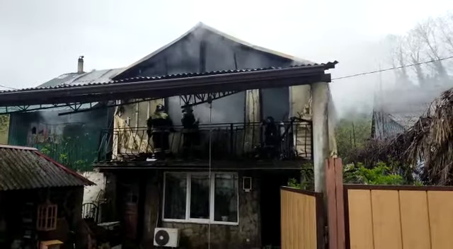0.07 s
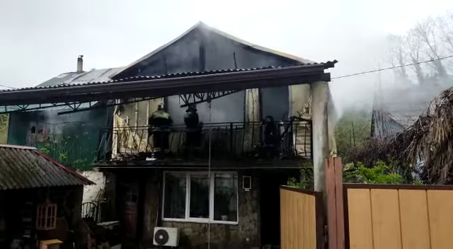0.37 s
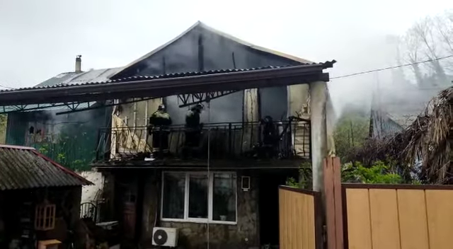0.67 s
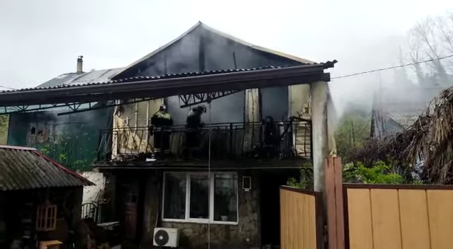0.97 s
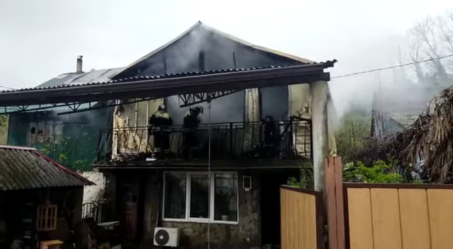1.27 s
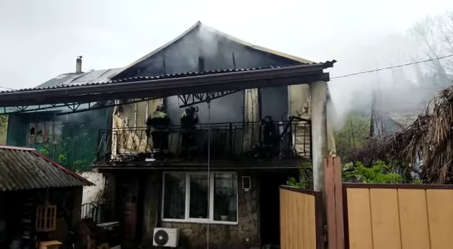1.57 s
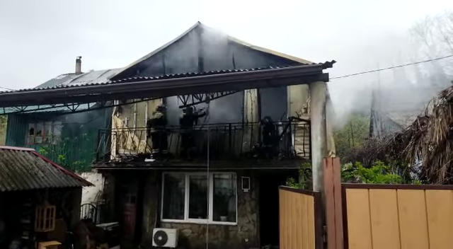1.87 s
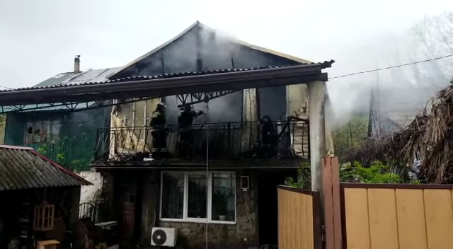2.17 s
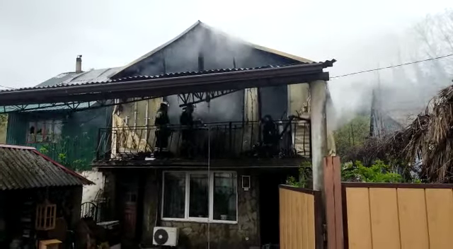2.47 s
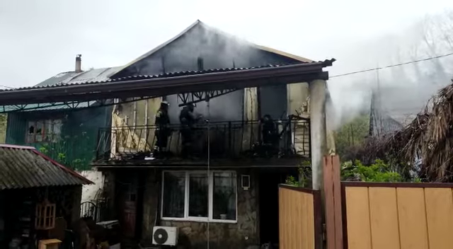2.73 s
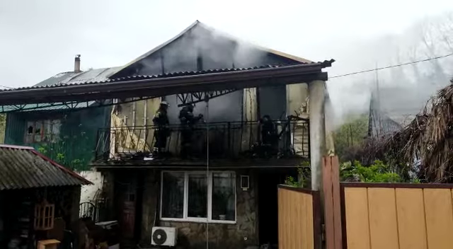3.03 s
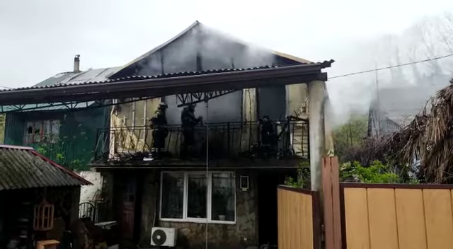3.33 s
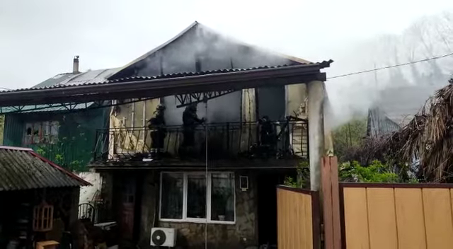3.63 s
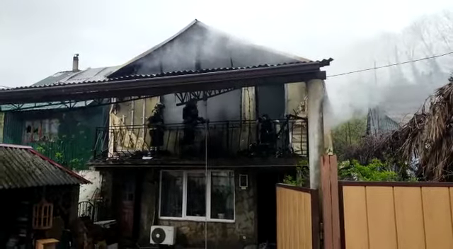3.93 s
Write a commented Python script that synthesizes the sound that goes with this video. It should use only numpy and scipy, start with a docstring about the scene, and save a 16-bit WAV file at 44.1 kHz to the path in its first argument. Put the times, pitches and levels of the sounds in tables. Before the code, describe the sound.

A diesel engine runs steadily outdoors, driving a water pump with a low drone, rapid metallic clatter and a faint whine. Behind it, water spray hisses softly and flares briefly past the middle and again at the end.

```python
"""Outdoors near a burning house, a six-cylinder diesel engine runs steadily and drives a pump.
Behind it lies a low rumble, water spray hisses and flares up briefly, and one distant knock sounds.
The pump hums and the gears whine faintly. Puffs of exhaust come so fast that they blend into a drone,
while injectors and valves knock on the engine block, clattering in the same rhythm every cycle."""
import sys
import numpy as np
from scipy.fft import rfft, irfft, next_fast_len
from scipy.io import wavfile
from scipy.ndimage import map_coordinates

SR = 44100
rng = np.random.default_rng(int(sys.argv[2]) if len(sys.argv) > 2 else 0)


def persist_wave(psi):
    """Save psi, clipped to +-1, as 16-bit WAV."""
    counts = np.round(np.clip(psi, -1, 1) * 32767).astype(np.int16)
    wavfile.write(sys.argv[1], SR, np.atleast_2d(counts).T)


N = 176400
CYCLE_HZ, CYLINDERS = 9.5723, 6  # in one engine cycle, every cylinder fires once
TOP_HZ = 8300  # upper edge of the sound


def amp(db):
    """Turn decibels into a number to multiply by."""
    return 10 ** (np.asarray(db) / 20)


def unit(x):
    """Scale a signal to an average strength (rms) of 1."""
    return x / np.sqrt(np.mean(x ** 2) + 1e-20)


def along(points, hz):
    """Read between (frequency, value) points on a logarithmic frequency scale."""
    point_hz, values = np.transpose(points)
    return np.interp(np.log(hz + 1), np.log(point_hz + 1), values)


def curve(rows):
    """Join (time, value) points with straight lines, giving one value per sample."""
    return np.interp(np.arange(N) / SR, *np.transpose(rows))


def wobble(rate):
    """A smooth curve through `rate` random values a second."""
    return map_coordinates(rng.standard_normal(400), [np.arange(N) * rate / SR], mode="mirror")


def filtered(x, response):
    """Turn each frequency in x up or down by the factor response(hz)."""
    size = next_fast_len(N + SR // 2)
    return irfft(rfft(x, size) * response(np.fft.rfftfreq(size, 1 / SR)), size)[:N]


def noise(colour):
    """Noise of strength 1; its colour says how strong each frequency is next to the others."""
    return unit(filtered(rng.standard_normal(N), lambda hz: amp(along(colour, hz))))


def tone(angle, db):
    """A pure tone with the given average (rms) level."""
    return np.sqrt(2) * amp(db) * np.cos(angle)


def rumble(level_db=-37):
    """A broad, low rumble around the engine that wavers in loudness."""
    # colour of the rumble (frequency [Hz], relative level [dB])
    colour = [(15, -12), (28, -9), (40, 2), (55, -5.5), (75, -6.5), (130, -4), (220, -8.5), (400, -16.5),
              (900, -29), (3000, -61.5)]
    return noise(colour) * amp(level_db + 2.4 * wobble(4.8))


def distant_knock(start_s=2.102, pitch_hz=645, rise_s=.012, ring_s=0.083):
    """One faint, hollow knock far away: a tone that dies out quickly."""
    age_s = np.maximum(np.arange(N) / SR - start_s, 0)
    rise = 1 - np.exp(-age_s / rise_s)
    fade = np.exp(-np.log(1000) * age_s / ring_s)  # falls 60 dB in ring_s
    return tone(2 * np.pi * pitch_hz * age_s, db=-22) * fade * rise


def water_spray(steady_db=-46, edge_share=0.16):
    """Spraying water hisses steadily, and the jet flares up in short bursts."""
    # colour of the steady hiss (frequency [Hz], relative level [dB])
    steady_colour = [(1000, -3.5), (3700, -3), (4100, -5), (4480, 5.5), (4750, -1), (4950, 4), (5300, -2.5),
                     (6150, -4.5), (6720, 8), (7000, -1.5), (7600, -2.5), (8300, -9.5)]
    # colour of a flare before its tilt (frequency [Hz], relative level [dB])
    flare_colour = [(1500, -22.5), (2600, 5), (3300, 3), (3900, -17), (4600, -3), (5300, -1.5),
                    (5900, -6.5), (6500, 3), (7100, -8), (7700, -3), (8300, -10.5)]
    # flares of the jet (start [s], length [s], level [dB], tilt toward the treble [dB per octave])
    flares = [(2.676, .35, -37, -2), (3.817, .04, -47, 25), (3.939, .05, -37, 37)]
    t = np.arange(N) / SR
    out = noise(steady_colour) * amp(steady_db + .5 * wobble(2.3) + 0.78 * wobble(18))
    for start, length, db, tilt_db in flares:
        fade_in_out = np.clip(np.minimum(t - start, start + length - t) / (edge_share * length), 0, 1)
        tilt = lambda hz: amp(tilt_db * np.log2(hz / TOP_HZ + 1e-6)) * (hz < TOP_HZ)
        hiss = unit(filtered(noise(flare_colour), tilt))
        out += fade_in_out * hiss * amp(db + 1.2 * wobble(40))
    return out


def engine_cycles(first_firing_s=.0115, wander_share=0.000721):
    """Count the cycles since the first firing; a speed regulator keeps the engine almost steady."""
    speed_hz = CYCLE_HZ * (1 + wander_share * wobble(3))
    return np.cumsum(speed_hz) / SR - first_firing_s * CYCLE_HZ


def pump(cycles, gain_db=-1.5, flutter_db=2.1):
    """The pump and belt-driven parts hum at pitches of their own that follow the engine's speed."""
    # tones of these parts (frequency at normal speed [Hz], relative level [dB])
    hums = [(120.2, -35.5), (259.8, -47.3), (519.5, -49.4), (1457, -46.6), (2240, -45.4), (4845, -63.6)]
    out = np.zeros(N)
    for hz, db in hums:
        angle = 2 * np.pi * (hz * cycles / CYCLE_HZ + rng.random()) + 0.23 * wobble(5)
        out += tone(angle, db + gain_db + flutter_db * wobble(3.4))
    return out


def gear_whine(cycles, gain_db=-1, flutter_db=2):
    """Gears turn in step with the engine's shaft; their tones flutter in the moving air."""
    # gear tones (vibrations per engine cycle [count], relative level [dB])
    gear_tones = [(33, -50.2), (60, -52.2), (66, -49.8), (74, -53.6), (76, -52.4), (80, -53.7), (83, -52.5),
                  (84, -48.1), (85, -53.0), (88, -50.1), (90, -47.1), (95, -50.3), (99, -50.4),
                  (101, -51.9), (107, -47.1), (117, -49.1), (118, -48.8), (120, -47.9), (126, -46.5),
                  (129, -47.1), (153, -43.7), (167, -45.1), (171, -43.7), (180, -44.5), (234, -46.3),
                  (264, -49.3)]
    out = np.zeros(N)
    for per_cycle, db in gear_tones:
        angle = 2 * np.pi * (round(per_cycle) * cycles + rng.random()) + 0.24 * wobble(6)
        out += tone(angle, db + gain_db + flutter_db * wobble(5))
    return out


def clatter(cycles, decay_s=0.0046, depth=0.37, scatter_db=1, gain_db=0.5):
    """An injector and two valves per cylinder knock on the block; part of each knock always repeats."""
    # colour of the engine block (frequency [Hz], relative level [dB])
    block_colour = [(150, -24), (260, -12), (380, -13), (560, -10), (880, -12), (1020, -7), (1200, -6),
                    (1500, -3), (1720, -1.5), (1900, 0.76), (2200, -4), (2420, -9), (2650, -9.5),
                    (3100, -16), (3650, -25.5), (4500, -25), (6000, -30.5), (8000, -36.5)]
    # how much of the clatter repeats from cycle to cycle (frequency [Hz], share [0 to 1])
    repeating = [(200, .25), (800, .35), (1200, 0.53), (1900, .3), (3000, 0.23), (6000, .1)]
    # loudness of the clatter (time [s], relative level [dB])
    loudness = [(0.0, -26.5), (0.11, -24.5), (0.34, -25.5), (0.65, -23.5), (0.72, -25.5), (0.89, -23),
                (1.17, -26), (1.24, -22.5), (1.36, -27), (1.39, -24), (1.46, -27.5), (1.57, -23.5),
                (1.77, -25.5), (1.84, -23.5), (1.98, -26.5), (2.04, -23), (2.08, -26), (2.23, -23),
                (2.32, -29), (2.33, -24.5), (2.64, -24), (2.73, -27), (2.78, -21.5), (2.82, -26.5),
                (2.84, -24.5), (3.89, -25), (3.92, -25), (3.93, -22), (3.98, -23.5), (4.0, -23)]
    count = 3 * CYLINDERS
    place = cycles % 1  # how far through its cycle the engine is
    knocks = np.ones(N)  # a steady floor, with a spike added for each knock
    for k, (shift, size) in enumerate(rng.standard_normal((count, 2))):
        age_s = (place - (k + .2 * shift) / count) % 1 / CYCLE_HZ
        knocks += depth * amp(scatter_db * size) * np.exp(-age_s / decay_s)
    period = int(SR / CYCLE_HZ)
    looped_noise = map_coordinates(rng.standard_normal(period), [place * period], mode="grid-wrap")
    block = lambda hz: amp(along(block_colour, hz))
    share = lambda hz: np.clip(along(repeating, hz), 0, 1)
    alike = filtered(looped_noise * knocks, lambda hz: block(hz) * np.sqrt(share(hz)))
    fresh = filtered(rng.standard_normal(N) * knocks, lambda hz: block(hz) * np.sqrt(1 - share(hz)))
    return unit(alike + fresh) * amp(gain_db + curve(loudness) + 0.28 * wobble(25))


def exhaust(cycles, skew_rad=0.66, swell_depth=0.73):
    """Six puffs a cycle make the drone; unequal cylinders add weaker tones in between."""
    # tones of the exhaust (vibrations per engine cycle [count], relative level [dB])
    drone_tones = [(3, -47.4), (5, -32.5), (6, -16.4), (7, -44.8), (8, -45.7), (9, -36.6), (10, -47.1),
                   (12, -23.9), (13, -47.5), (15, -45.4), (16, -47.6), (18, -47.2), (20, -45.2),
                   (24, -49.6)]
    # swell of the drone, before swell_depth scales it (time [s], relative level [dB])
    swell = [(0.0, -13), (0.05, -19.5), (0.11, -14.5), (0.49, -17), (0.53, -14.5), (0.79, -15), (1.08, -13),
             (1.12, -17), (1.75, -15), (1.77, -19), (1.83, -12), (2.0, -20.5), (2.05, -12.5), (2.1, -17),
             (2.16, -12.5), (2.33, -18.5), (2.36, -14.5), (2.7, -15.5), (2.74, -17), (2.8, -14),
             (2.85, -15.5), (2.91, -14), (2.95, -17), (3.02, -14.5), (3.2, -18), (3.22, -15.5),
             (3.45, -14.5), (3.51, -19.5), (3.54, -15.5), (3.77, -14.5), (3.8, -18.5), (4.0, -12.5)]
    drone = np.zeros(N)
    for per_cycle, db in drone_tones:
        per_cycle = round(per_cycle)
        if per_cycle % CYLINDERS:  # an in-between tone
            phase = rng.uniform(0, 2 * np.pi)
        else:  # lined up so that each puff rises faster than it falls
            phase = skew_rad * (per_cycle / CYLINDERS - 1)
        drone += tone(2 * np.pi * per_cycle * cycles + phase, db)
    swell_db = curve(swell)
    return drone * amp(swell_depth * (swell_db - swell_db.mean()))


def scene():
    """Add the engine and its pump to the background sounds, in one channel."""
    cycles = engine_cycles()
    engine = exhaust(cycles) + clatter(cycles) + gear_whine(cycles) + pump(cycles)
    return (engine + rumble() + water_spray() + distant_knock())[None]


def record(dry):
    """The microphone dulls the highest sounds, and the recorder cuts them off around TOP_HZ."""
    # treble loss of the microphone (frequency [Hz], level [dB])
    treble_loss = [(7600, 0), (8000, -10.5), (8300, -15)]
    dulled = filtered(dry[0], lambda hz: amp(along(treble_loss, hz)))
    return filtered(dulled, lambda hz: np.clip((TOP_HZ - hz) / 200 + .5, 0, 1))[None]


dry = scene()
out = record(dry)
persist_wave(out)
```